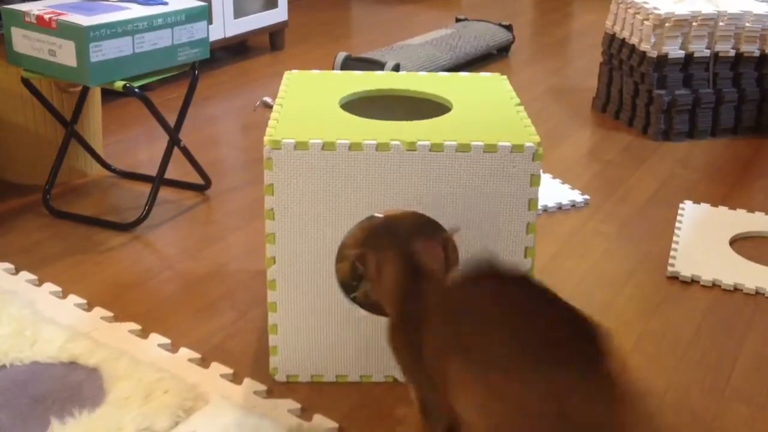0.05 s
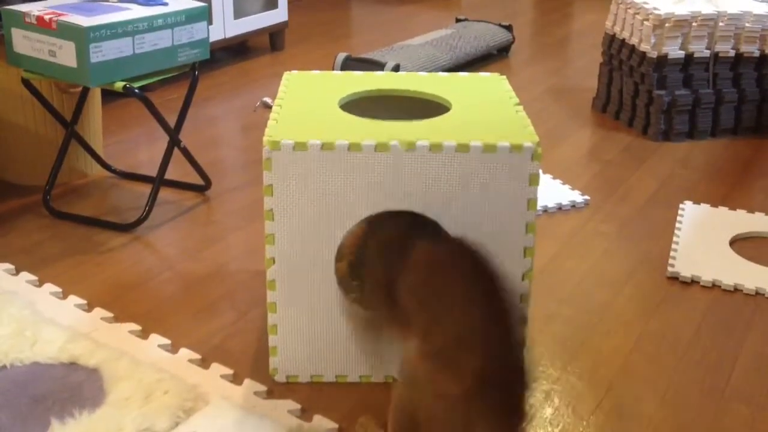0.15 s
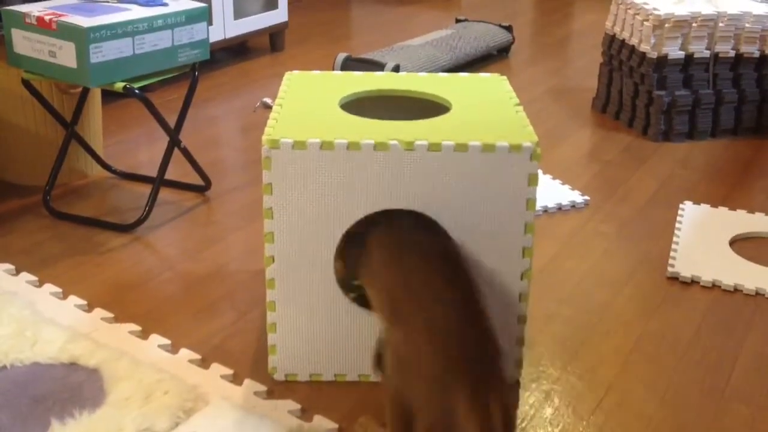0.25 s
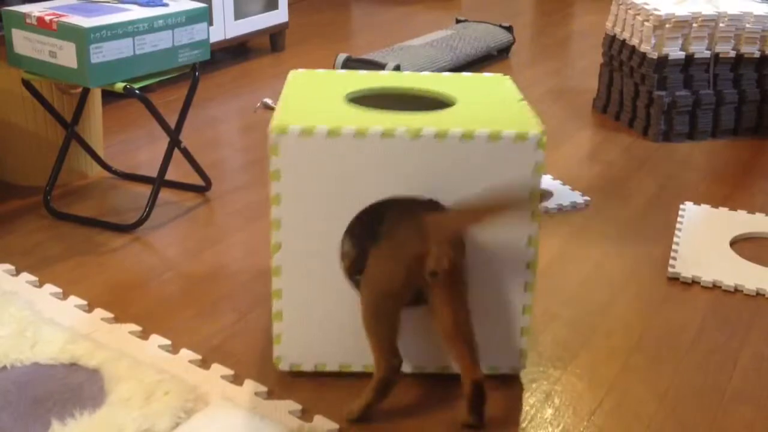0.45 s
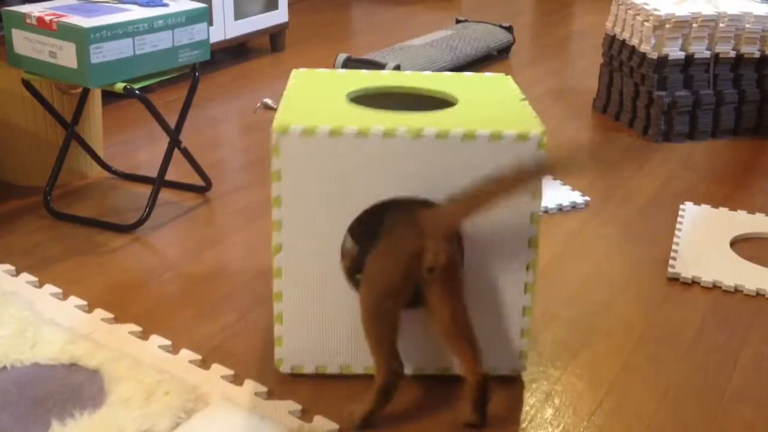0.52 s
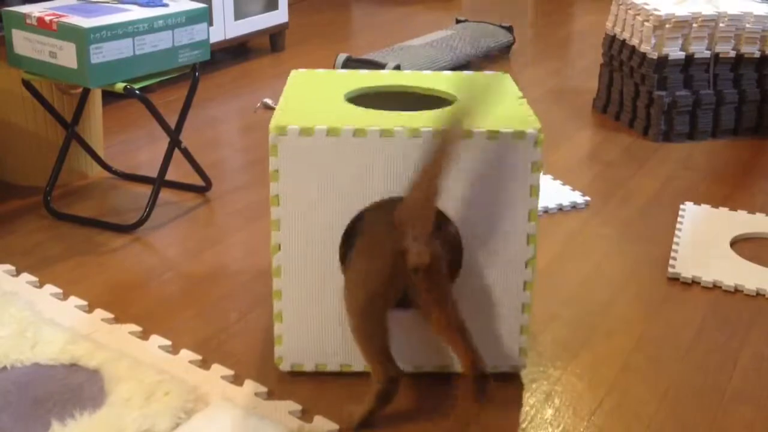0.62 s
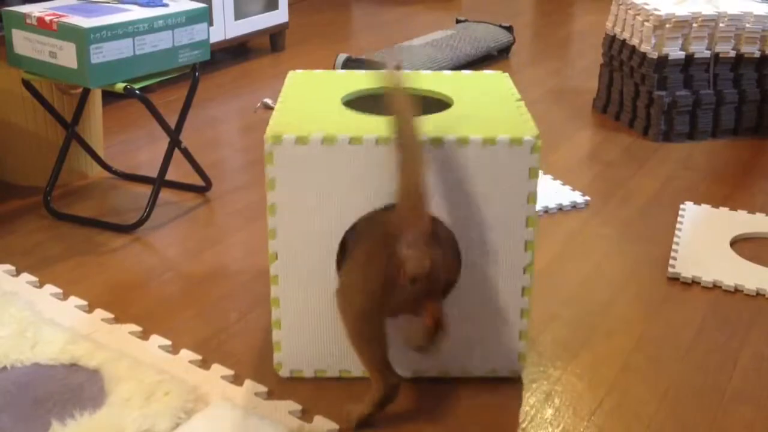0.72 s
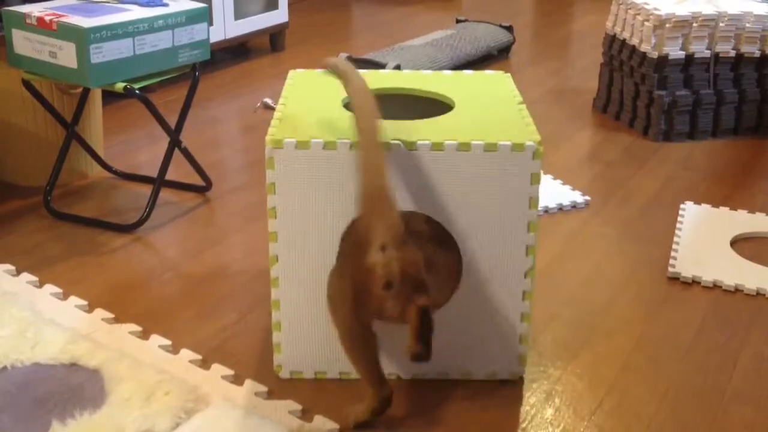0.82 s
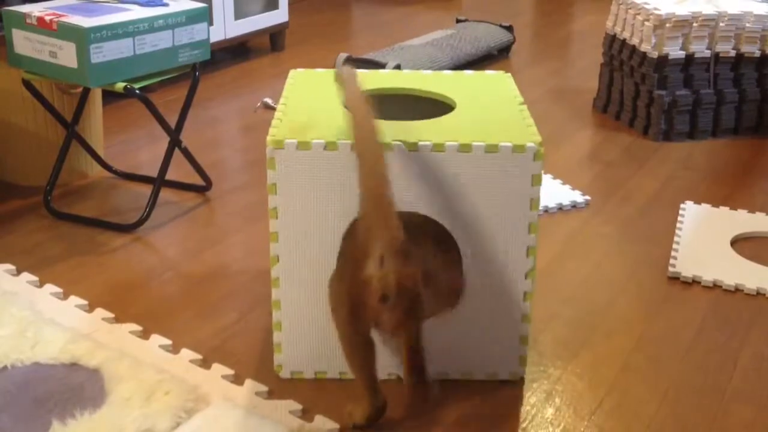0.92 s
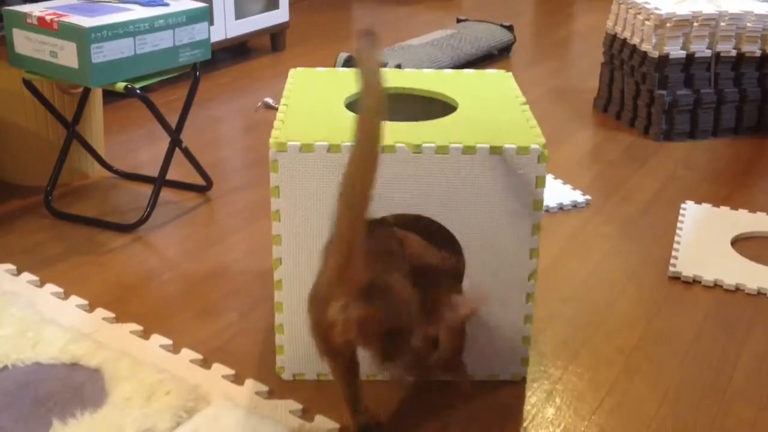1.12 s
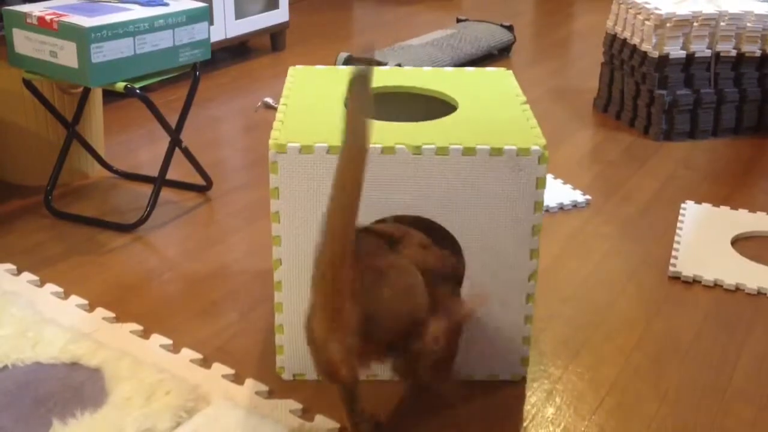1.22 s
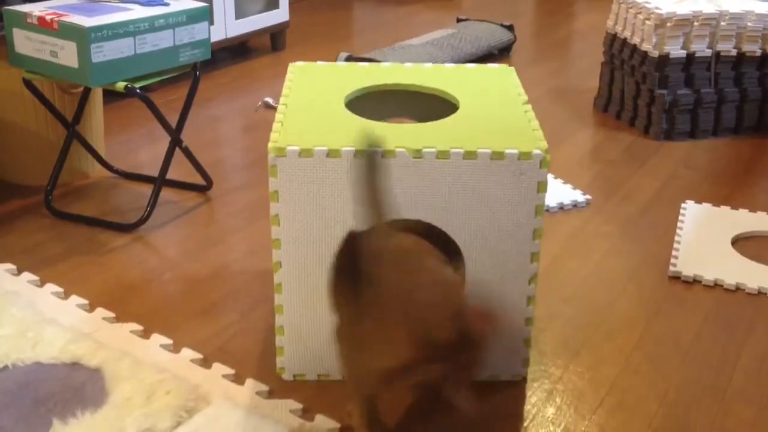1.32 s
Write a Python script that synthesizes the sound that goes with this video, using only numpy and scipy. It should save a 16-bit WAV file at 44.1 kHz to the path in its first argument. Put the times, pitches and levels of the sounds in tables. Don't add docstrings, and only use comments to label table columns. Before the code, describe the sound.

Hollow thumps of cats bumping a foam-mat cube: faint brushing and a tiny tick first, then a strong rapid cluster at 0.21-0.26 s, ringing short and boxy. Weaker bumps, claw ticks and gritty scrapes run from 0.33 to 0.5 s. After a lull, a mat edge smacks the hard floor at 0.79 s with a brief rattle. Soft bumps and fur rubbing follow; a faint creak at 1.26 s. Quiet room hiss throughout.

```python
import sys
import numpy as np
from scipy import signal
from scipy.io import wavfile

SR = 44100
rng = np.random.default_rng(int(sys.argv[2]) if len(sys.argv) > 2 else 0)


def persist_wave(psi):
    counts = np.round(np.clip(psi, -1, 1) * 32767).astype(np.int16)
    wavfile.write(sys.argv[1], SR, np.atleast_2d(counts).T)


def boost(x):
    u = np.asarray(x, float) / 20
    return 10 ** u


N = 59535
TIME = np.arange(N) / SR


def rms_one(x):
    return x / np.sqrt(np.mean(x ** 2) + 1e-20)


def band_pass(x, edges_hz):
    return signal.sosfilt(signal.butter(2, edges_hz, "band", fs=SR, output="sos"), x)


def at_hz(points, hz):
    table_hz, values = np.array(points)[:, 0], np.array(points)[:, 1]
    return np.interp(np.log(hz), np.log(table_hz), values)


def drift(rate_hz):
    knots = rng.standard_normal(200)
    return np.interp(TIME * rate_hz, np.arange(200), knots)


def add(out, start_s, x):
    i = int(start_s * SR)
    out[i:i + len(x)] += x[:N - i]


def bands(colour, gain):
    shaped, plain = 0, 0
    edges = 45 * 2 ** np.arange(0, 9, 0.5)
    white = rng.standard_normal((2, N))
    for k, (low, high) in enumerate(zip(edges, edges[1:])):
        hz = np.sqrt(low * high)
        band = boost(at_hz(colour, hz)) * band_pass(white[k % 2], [low, high])
        shaped = shaped + gain(hz) * band
        plain = plain + band
    return shaped / np.std(plain)


def thumps():
    # start_s, level_db, centre_hz (of the struck modes), spread_octaves
    bumps = [(0.154, -37.5, 240, 0.3), (0.167, -36.5, 282, 1.34), (0.181, -39, 250, 0.38),
             (.190, -37, 750, 0.88), (0.2138, -19, 860, 0.65), (0.215, -15, 205, 0.47),
             (.226, -20, 377, 0.39), (.2382, -16.5, 620, 0.5), (0.2447, -17, 215, 0.46),
             (.256, -23.5, 360, 0.37), (.290, -37, 475, 0.94), (0.332, -30.5, 215, 0.33),
             (.393, -39.5, 530, 0.94), (.400, -25.5, 332, 0.3), (0.423, -41, 340, 0.4),
             (.447, -33, 138, 0.49), (0.455, -26.5, 134, 0.41), (0.503, -39, 193, 0.53),
             (0.52, -51, 240, 0.6), (.668, -55.5, 220, .4), (0.7, -41, 230, 0.37), (0.7904, -24, 262, 0.27),
             (.812, -41.5, 260, 0.48), (.853, -43.5, 258, 0.36), (0.907, -48.5, 215, 0.5),
             (.955, -49, 215, .4), (1.014, -46.5, 323, 0.54), (1.102, -39.5, 215, 0.35),
             (1.106, -50, 660, 0.19), (1.124, -52, 300, 0.58)]
    # pitch_hz, level_db, t60_s (time to fall 60 dB)
    cube = [(131, -5, 0.09), (166.8, -4.5, 0.125), (215, 5.5, 0.11), (250.8, 2.5, 0.1), (329.7, 0.5, 0.16),
            (359.4, -1.5, 0.13), (476.5, -1.5, 0.055), (536, 1, 0.087), (687.6, -1, 0.071), (771, 4, 0.041),
            (900, -3.5, .08), (1023, -5.5, 0.077), (1310, -15, 0.027), (1670, -6.5, 0.072)]
    press_damping = 0.27
    contact_cycles = 0.51
    strike_chance_db = 1.0
    puff_db, puff_per_octave_db, puff_t60_s = -35, 6.5, 0.11

    out, t = np.zeros(N), TIME[:SR // 3]
    hz, mode_db, t60_s = np.transpose(cube)[:, :, None]
    chance = rng.standard_normal((len(bumps), len(cube), 2, 1))
    air = rms_one(band_pass(rng.standard_normal(N + SR), [900, 2800]))
    for (start_s, level_db, centre_hz, spread), c in zip(bumps, chance):
        reach_db = -6 * (np.log2(hz / centre_hz) / spread) ** 2
        fall_db = -60 * t / t60_s * (1 + press_damping / spread)
        loudness = boost(mode_db + reach_db + strike_chance_db * c[:, 0] + fall_db)
        rings = loudness * np.sin(2 * np.pi * hz * t + c[:, 1] / 4)

        hardness_hz = centre_hz * spread
        puff_level_db = puff_db + puff_per_octave_db * np.log2(hardness_hz / 300)
        puff = boost(puff_level_db - 60 * t / puff_t60_s) * air[int(start_s * SR):][:len(t)]
        rise = 1 - np.exp(-t * hardness_hz / contact_cycles)
        add(out, start_s, boost(level_db - 0.5) * rise * (rings.sum(axis=0) + puff))
    return out


def slap():
    # pitch_hz, level_db
    tail_colour = [(240, -5), (400, -6.5), (1270, -8), (1880, -9), (3610, -12), (4600, -8), (5110, -16.5),
                   (5950, -11.5), (15000, -45)]
    # pitch_hz, t60_s
    tail_decay = [(400, 0.21), (2000, 0.24), (5000, 0.21), (9000, 0.45), (15000, 0.11)]
    # pitch_hz, level_db, t60_s
    edge_modes = [(698, -15, 0.062), (1120, -29, 0.044), (1650, -33, 0.019), (2567, -15, 0.032),
                  (3150, -15, 0.016), (4610, -21.5, 0.045), (7380, -12.5, 0.0095), (7900, -19, 0.0084)]
    start_s, level_db, length_ms, tail_db = 0.7851, -21, 0.22, -38.5

    t = np.maximum(TIME - start_s, 0)
    u = (TIME - start_s - 0.0003) * 1000 / length_ms
    pulse = -boost(level_db) * np.exp(-u ** 2) * np.cos(np.pi * u - 0.6)

    def tail_gain(hz):
        return (t > 0) * boost(-60 * t / at_hz(tail_decay, hz) + drift(90))

    tail = boost(tail_db) * bands(tail_colour, tail_gain)
    rings = np.zeros(N)
    for hz, mode_db, t60_s in edge_modes:
        rings += boost(level_db + mode_db - 60 * t / t60_s) * np.sin(2 * np.pi * hz * t)
    return pulse + rings + tail


def ticks():
    # start_s, level_db, low_ring_hz, high_ring_db
    snaps = [(0.054, -60, 4630, -8), (.168, -47, 2280, -20), (.2135, -34.5, 2260, -20),
             (0.2386, -34, 1590, -25), (.403, -43, 2160, 1.5), (.408, -42.5, 2280, 4.5),
             (.424, -36, 2400, 2), (.462, -38, 2990, 3.5), (0.4661, -36.5, 2800, 3), (0.4705, -48, 3000, 0),
             (.558, -63, 2800, -14), (1.017, -60, 1250, -3)]
    t60_s, rise_s, high_rings_hz = 0.0077, 0.00023, [6600, 7600, 9000]

    out, t = np.zeros(N), TIME[:SR // 20]
    for (start_s, level_db, hz, high_db), c in zip(snaps, rng.standard_normal((len(snaps), 4))):
        second_hz = hz * (1.185 + 0.036 * c[0])
        low = np.sin(2 * np.pi * hz * t) + 0.43 * np.sin(2 * np.pi * second_hz * t)
        high = sum(np.sin(2 * np.pi * f * (1 + 0.045 * j) * t) for f, j in zip(high_rings_hz, c[1:]))
        shape = boost(level_db + 4 - 60 * t / t60_s) * (1 - np.exp(-t / rise_s))
        add(out, start_s, shape * (low + boost(high_db - 8.5) * high))
    return out


def skids():
    # start_s, length_s, level_db, centre_hz, width_hz
    slides = [(.04, 0.024, -57, 10700, 8100), (0.175, 0.031, -56.5, 8000, 3940),
              (0.213, 0.033, -48.5, 9000, 3440), (0.276, 0.086, -53, 8420, 3000),
              (0.394, 0.049, -52.5, 3000, 3150), (0.46, 0.049, -46.5, 3270, 900),
              (0.529, 0.052, -60.5, 2680, 1510), (0.589, 0.05, -58.5, 2570, 1360),
              (.92, 0.14, -68, 1240, 1300), (0.222, 0.017, -52, 2480, 1200), (0.036, 0.043, -63, 4620, 400),
              (1.007, 0.022, -53, 1090, 1195)]
    grains_per_s, grit_amount = 3300, 0.43

    out = np.zeros(N)
    grit = rms_one((rng.random(N) < grains_per_s / SR) * rng.standard_normal(N))
    rub = grit_amount * grit + rng.standard_normal(N)
    for start_s, length_s, level_db, hz, width_hz in slides:
        edges = [max(hz - width_hz / 2, 200), min(hz + width_hz / 2, 19000)]
        swell = np.sin(np.pi * np.clip((TIME - start_s) / length_s, 0, 1)) ** 2
        out += boost(level_db) * swell * rms_one(band_pass(rub, edges))
    return out


def creak():
    start_s, length_s, from_hz, to_hz = 1.262, 0.0666, 740, 620
    level_db, wobble_db, wobble_hz = -53, 3.0, 55

    u, wobble = np.clip((TIME - start_s) / length_s, 0, 1), drift(140)
    hz = from_hz + (to_hz - from_hz) * u + wobble_hz * wobble[::-1]
    swell = np.sin(np.pi * u ** 1.4) ** 2
    return boost(level_db + wobble_db * wobble) * swell * np.sin(2 * np.pi * np.cumsum(hz) / SR)


def fur():
    # time_s, level_db
    effort = [(0, -63.5), (.07, -67.5), (.135, -89), (0.171, -54.5), (.27, -57.5), (0.371, -62),
              (0.403, -55), (.48, -53), (0.522, -57), (.62, -61), (.65, -64.5), (.76, -62.5), (.88, -59.5),
              (.99, -55.5), (1.082, -61.5), (1.115, -55.5), (1.16, -61), (1.35, -64.5)]
    # pitch_hz, level_db
    brush_colour = [(60, -43), (110, -0.5), (230, -7.5), (700, -5), (1500, -11.5), (3000, -16.5),
                    (5500, -17), (9000, -15.5)]
    patchy_db, trim_db = 0.8, 1.5

    time_s, level_db = np.transpose(effort)
    together = drift(25.6)
    hiss = bands(brush_colour, lambda hz: boost(patchy_db * (together + drift(14.5))))
    return boost(np.interp(TIME, time_s, level_db) + trim_db) * hiss


def room(x):
    level_db, t60_s, gap_s, cut_hz = -12, 0.27, 0.006, 7000
    t = TIME[:SR // 2]
    echoes = rng.standard_normal(len(t)) * boost(-60 * t / t60_s) * (t > gap_s)
    echoes = signal.lfilter(*signal.butter(1, cut_hz, fs=SR), echoes)
    echoes = echoes / np.sqrt(np.sum(echoes ** 2))
    return boost(level_db) * signal.fftconvolve(x, echoes)[:N]


def room_tone():
    # pitch_hz, level_db
    tone_colour = [(60, -15), (160, -2.5), (300, -4), (800, -7.5), (1500, -10.5), (3500, -16.5),
                   (8000, -15.5), (15500, -21)]
    return boost(-64) * bands(tone_colour, lambda hz: 1)


def scene():
    play = thumps() + slap() + ticks() + skids() + creak()
    return (play + room(play) + fur() + room_tone())[None]


def low_pass(x):
    return signal.sosfilt(signal.butter(12, 15760, fs=SR, output="sos"), x)


def record(dry):
    low_hz, top_hz = 119, 16000
    heard = signal.sosfilt(signal.butter(3, low_hz, "high", fs=SR, output="sos"), dry)
    heard = signal.sosfilt(signal.cheby2(14, 60, top_hz, fs=SR, output="sos"), heard)
    return low_pass(heard)


dry = scene()
out = record(dry)
persist_wave(out)
```